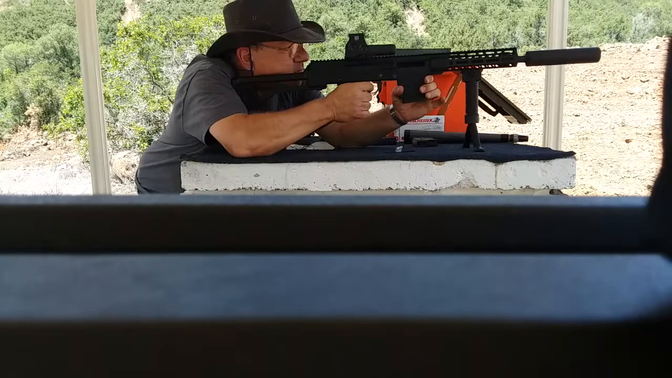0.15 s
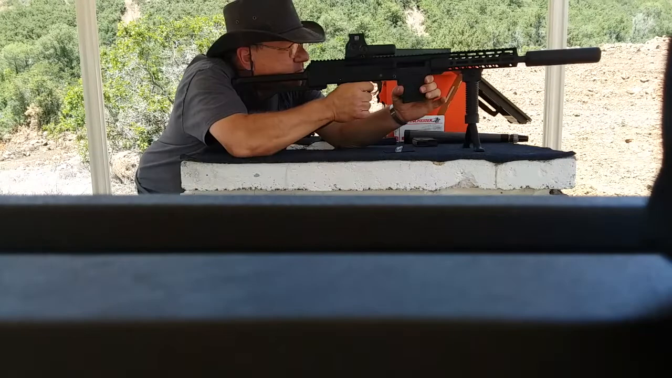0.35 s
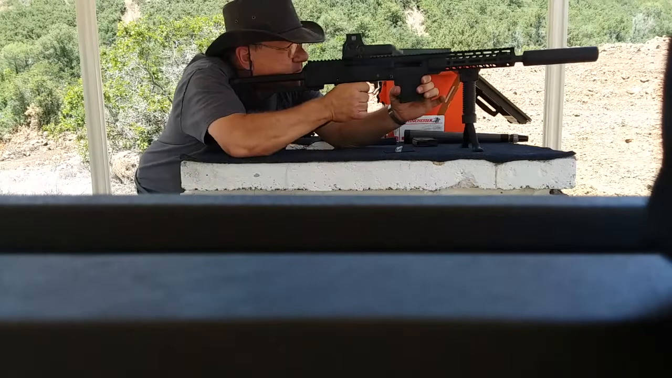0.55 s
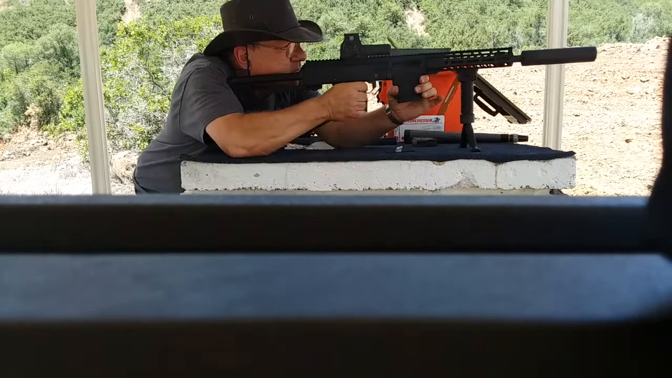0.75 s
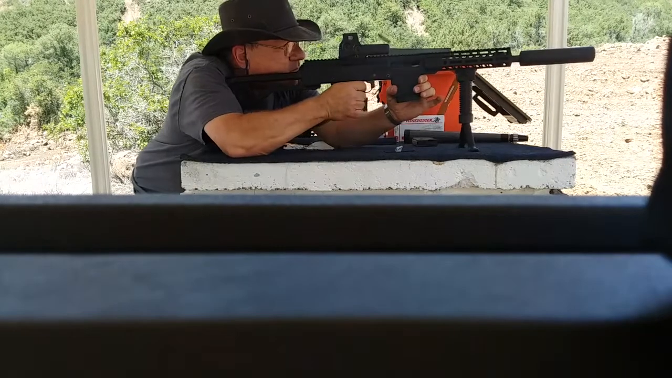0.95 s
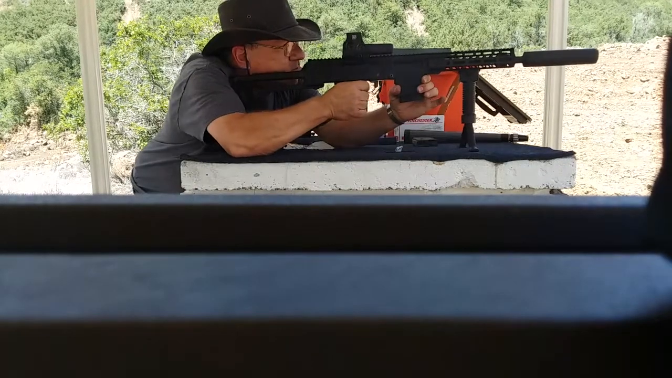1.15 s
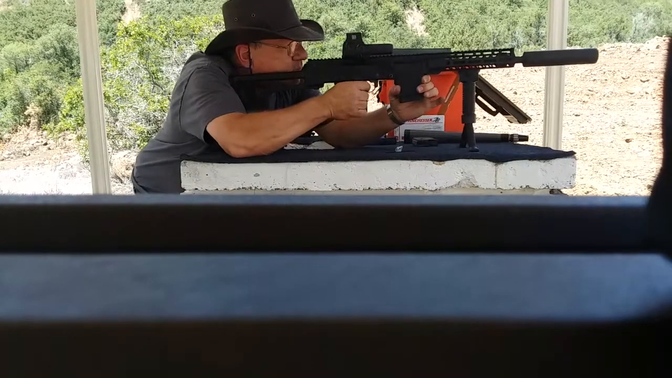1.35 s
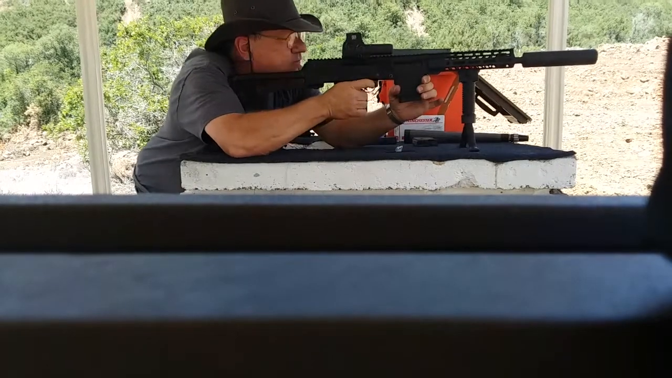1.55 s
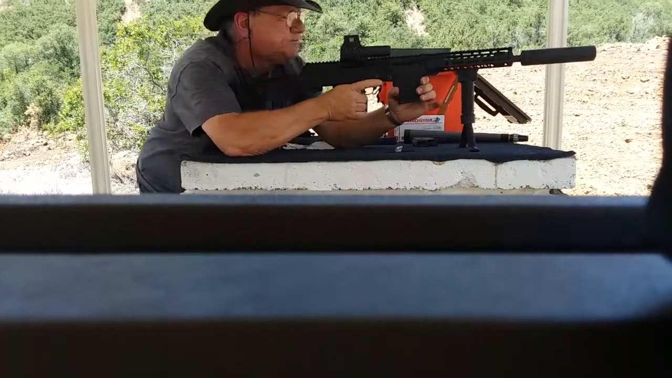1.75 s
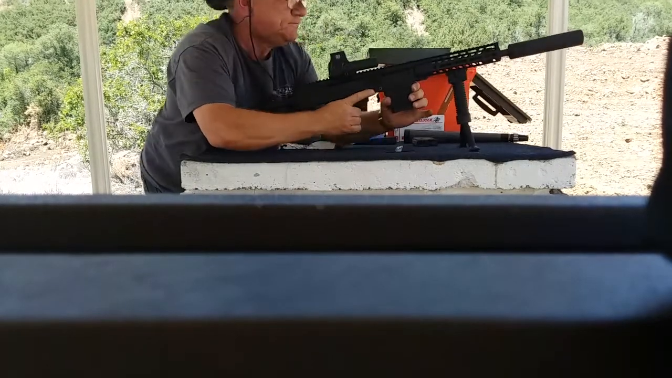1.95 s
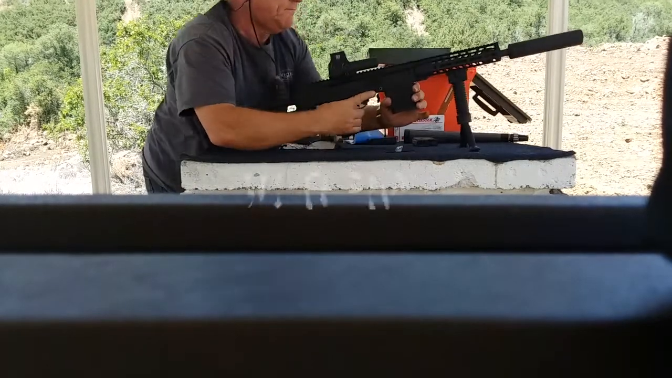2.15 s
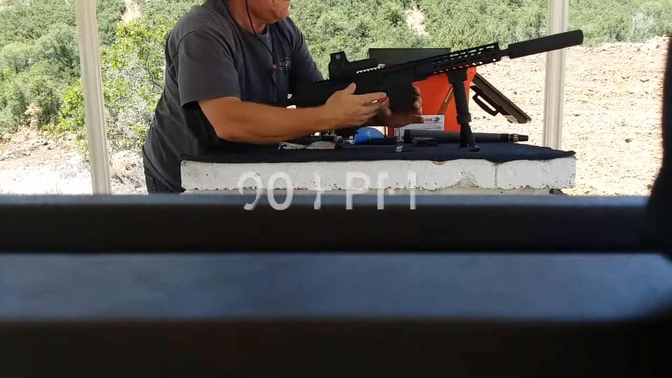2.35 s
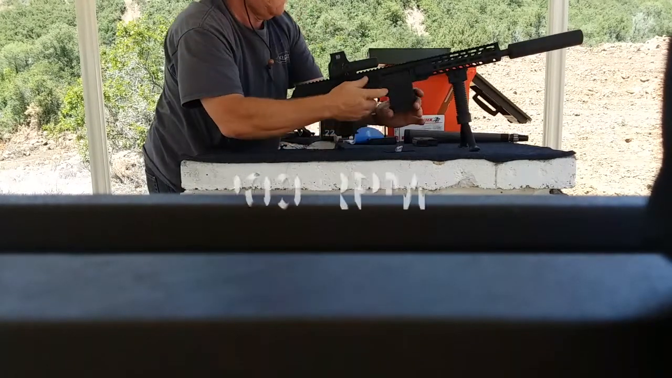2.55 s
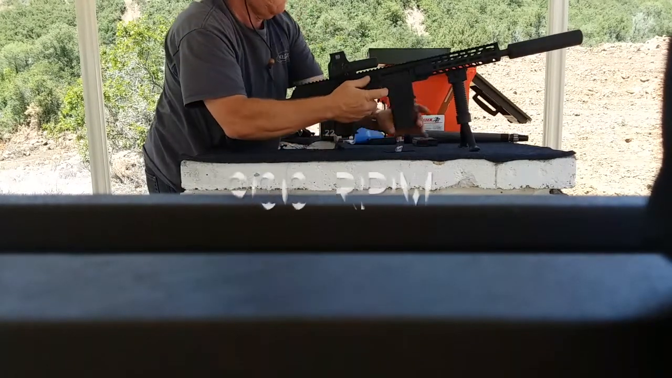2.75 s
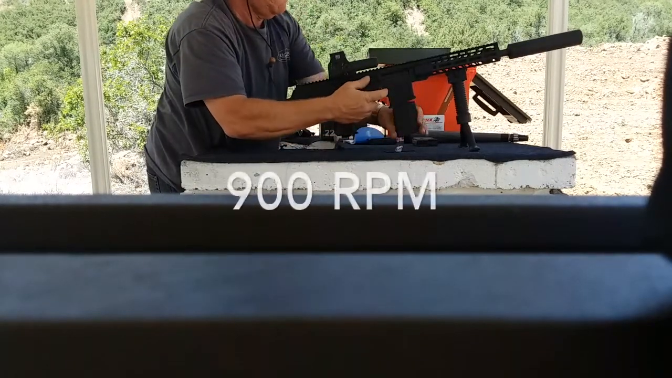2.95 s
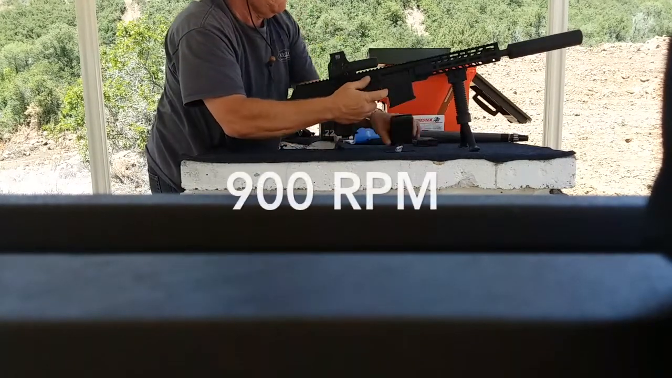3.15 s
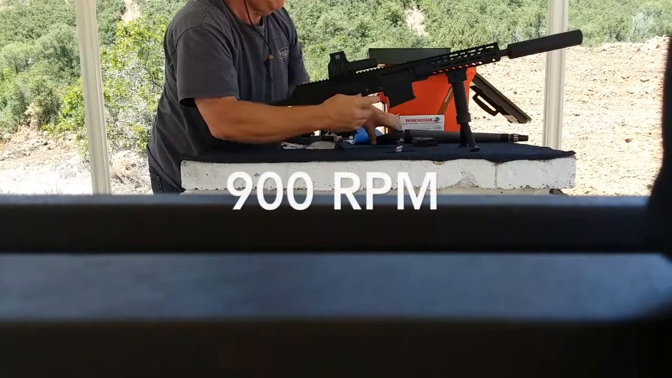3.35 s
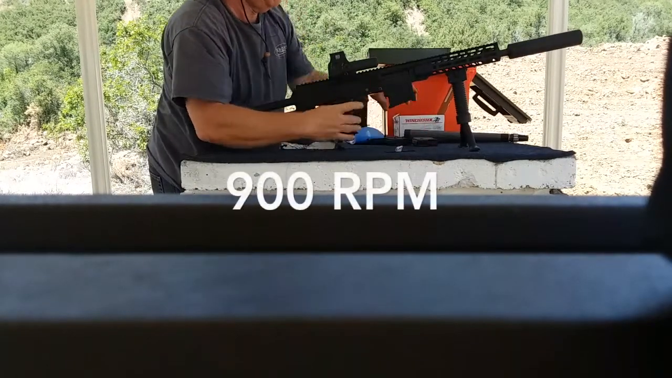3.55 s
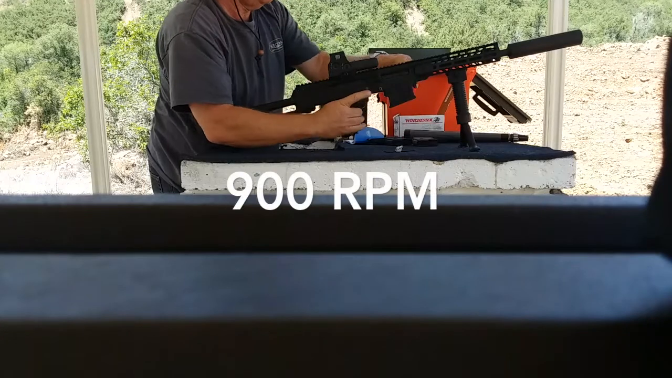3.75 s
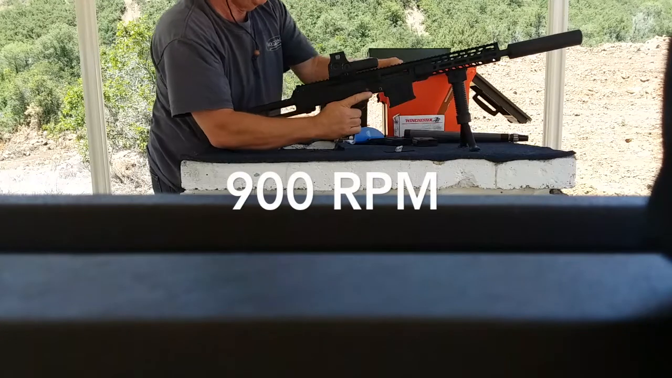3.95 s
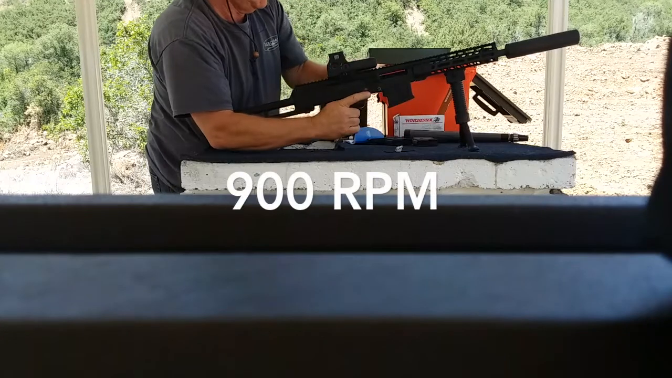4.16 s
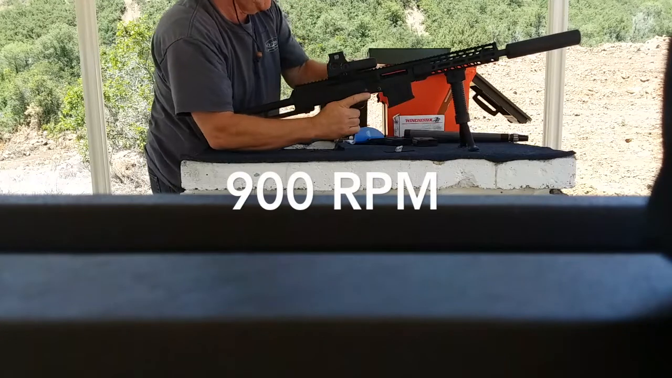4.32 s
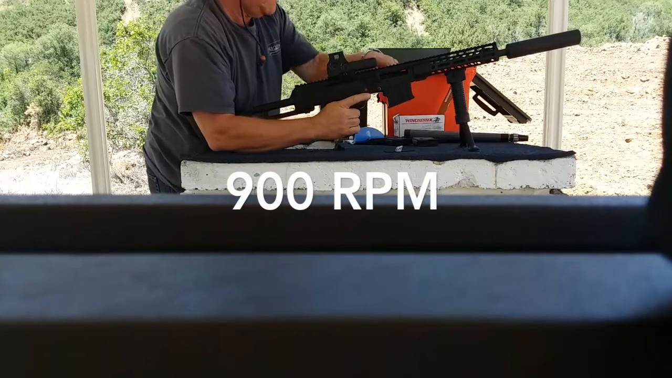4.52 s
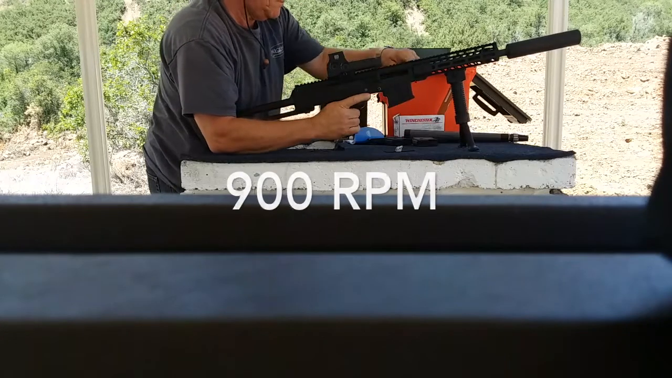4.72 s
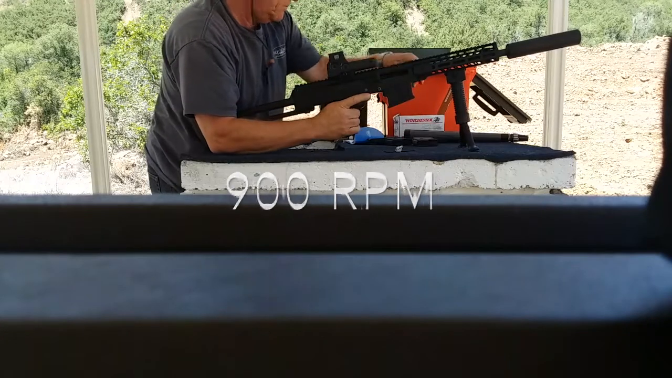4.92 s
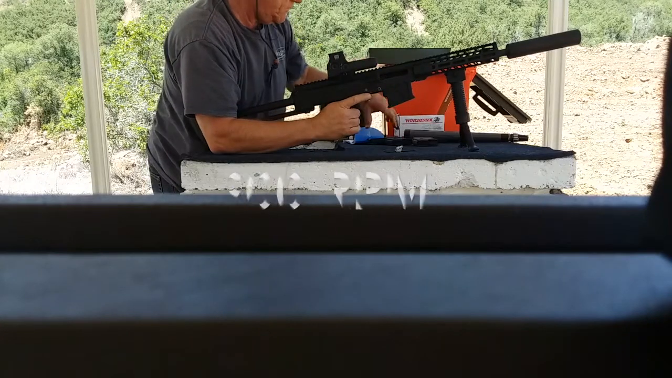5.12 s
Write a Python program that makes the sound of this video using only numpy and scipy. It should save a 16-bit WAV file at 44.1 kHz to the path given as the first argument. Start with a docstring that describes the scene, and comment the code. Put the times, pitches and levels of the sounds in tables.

```python
"""A low rumble and faint air come first, with a few clacks; then a suppressed rifle fires ten rounds on automatic.
It lies on a concrete bench under a shelter, close to the microphone; each round sounds as filtered bursts of noise.
Banded noise echoes from the hills; spent cases ring on the slab as beating sines.
Then the rifle is set down, its magazine is taken out and the action worked: noise rings resonators and rubs;
decaying sines make the bench boom and thin steel ring. A faint squeak comes near the end."""
import sys
import numpy as np
from scipy import signal
from scipy.fft import rfft, irfft
from scipy.io import wavfile
from scipy.ndimage import uniform_filter1d

SR = 44100
rng = np.random.default_rng(int(sys.argv[2]) if len(sys.argv) > 2 else 0)


def file_out(sig):
    """Save sig as 16-bit WAV at sys.argv[1]."""
    # one column per channel
    cols = np.atleast_2d(sig).T
    # limit, then scale
    lim = np.clip(cols, -1, 1)
    pcm = np.round(lim * 32767).astype(np.int16)
    wavfile.write(sys.argv[1], SR, pcm)


N = 233096
TIME = np.arange(N) / SR
AGE = TIME[:SR // 2]  # seconds since the start of one short sound

# Spectra of noise: frequency_hz, relative_density_db (per Hz)
AIR_SPECTRUM = [(30, -16.5), (80, -5), (200, -19.5), (600, -19), (2000, -26.5), (6000, -31.5), (16000, -33)]
HILL_SPECTRUM = [(60, -28), (130, 0), (200, -5.5), (350, -9.5), (550, -3.5), (1200, -6), (2500, -7.5),
                 (4000, -13.5), (5500, -24), (9000, -44.5)]
CLACK_SPECTRUM = [(60, -39.5), (200, -18), (450, -1), (900, 5.5), (2400, -1), (4000, -8.5), (5200, -14.5),
                  (7000, -11.5), (11000, -22.5), (16000, -18)]
BLAST_SPECTRUM = [(29, -52.5), (50, -25.5), (114, -5.5), (291, -9), (353, -1.5), (532, -6.5), (678, -1.5),
                  (1360, -6), (2320, -8), (2750, -10), (3580, -10.5), (6090, -17), (8970, -15.5),
                  (11700, -10), (16000, -17)]
# Resonances of the action under friction, main one first: frequency_hz, width_hz, gain_db
ACTION_MODES = [(1199, 45, 11), (1368, 265, -7.5), (2540, 440, -7.5), (3480, 200, -14)]
# Resonances of the struck receiver: frequency_hz, width_hz, gain_db
RECEIVER_MODES = [(537, 51, -4), (1223, 93, 6.5), (1370, 82, -9), (1890, 110, -5), (2330, 180, -6),
                  (2620, 61, -4.5), (3230, 50, -8), (3540, 93, -2.5), (4390, 45, -4), (6214, 93, 2),
                  (7050, 300, -9)]
# Thin steel parts that ring on as the rifle is set down: frequency_hz, relative_level_db, t60_s
STEEL_MODES = [(1836, -8, 0.33), (3408, -7, 0.45), (3740, -12, .43), (4210, -12, 0.2), (4350, 2, 0.17),
               (7262, -9, .19)]
# Dull bumps on the bench, and a spent case striking a plastic box at 1.254 s: start_s, peak_db, pitch_hz, t60_s
BUMPS = [(1.1, -26.5, 122.6, 0.54), (1.254, -22, 420.5, .17), (1.439, -40, 130, 0.23),
         (1.67, -44.5, 154.5, 0.27), (2.141, -34, 230.7, 0.42), (2.84, -33, 103.6, .087),
         (2.99, -44, 120.6, 0.13), (3.107, -42.5, 91.2, 0.078)]
# Spent cases land: start_s, main_ring_db, low_ring_db, tick_db
CASE_LANDINGS = [(1.335, -32.5, -46, -40), (1.438, -21.5, -33, -45), (1.57, -32.5, -53, -38),
                 (1.779, -27.5, -43, -40), (1.858, -27, -41, -37.5), (1.904, -35, -43, -36),
                 (2.104, -37, -38, -33), (2.142, -25, -40, -36), (2.245, -32, -45.5, -54),
                 (2.55, -39, -47.5, -58)]
# Parts slide and rub: start_s, length_s, rub_level_db, treble_db (before the hiss gain),
# main_mode_db (gain of the main resonance against the upper ones)
STROKES = [(1.549, 0.042, -38.5, -40, -18), (2.276, 0.052, -50, -48, -14), (2.48, 0.25, -43.5, -47, -14),
           (3.736, .15, -57, -72, -5), (3.911, 0.13, -43, -53, -7), (4.43, 0.13, -42, -59.5, -1)]
# Clacks of the rifle, its magazine and things that hit the benches: start_s, middle_band_db,
# weight_db and brightness_db (low and high band against the middle), contact_t60_s,
# receiver_ring_db (before the common ring gain)
CLACKS = [(0.28, -56, -18, -6, 0.034, -2), (0.416, -38.5, -20, 3, .044, -11),
          (.428, -18.5, -21, -6, 0.12, -17), (.453, -20.5, 0, -1, 0.047, -11),
          (1.116, -10, -3.5, 2.5, 0.0048, 2.5), (1.2532, -16.5, 4, -22, 0.0038, -32),
          (1.3462, -22.5, -17, 0, 0.0041, -26), (1.3564, -14.5, -9.5, -4.5, 0.0034, -30),
          (1.431, -24.5, -5, 0.5, 0.016, -27), (1.4484, -13.5, -6, -10.5, 0.0041, -28),
          (1.511, -26, -3.5, -2, .002, -14), (1.954, -34.5, -1, -10.5, 0.013, -12),
          (2.133, -25.5, -4, -3, 0.077, -12), (2.149, -22.5, -9.5, 0, 0.12, -6),
          (2.669, -23.5, -5.5, -7, 0.019, 5), (2.96, -39, -11, -18.5, 0.026, 2),
          (3.417, -28.5, -9, -17, 0.038, -9), (3.435, -25, -11.5, -17, 0.085, -16),
          (3.515, -27.5, -14, -18.5, 0.061, -12), (3.735, -42, -23, -8.5, 0.016, 0),
          (3.819, -41.5, -24, -7, .028, -5), (3.962, -29, -13.5, -9.5, 0.03, -10.5),
          (4.053, -17, -25, 1.5, 0.014, -13), (4.06, -16, -15.5, -4.5, 0.023, -10),
          (4.305, -26.5, -6.5, -3, .024, -3.5), (4.399, -44, -9, -3, .004, -9),
          (4.597, -16.5, -24, 1, 0.0073, 5.5), (4.605, -22.5, -23, -5, 0.01, 8),
          (4.794, -45, -31, -18, 0.013, 15)]
# What every round sets off: delay_s, rise_s, t60_s, low_hz, high_hz, level_db (before scatter and burst gain).
# Rows: supersonic crack, muzzle report, gas from the ejection port, carrier slides,
# buffer driven home, bolt slams shut, recoil thumps the bench.
# The filter widens bands below a third of an octave and ends them under half the sample rate.
ROUND_CYCLE = [(0.001, .002, 0.21, 12400, 14400, -18.5), (-.002, 0.0017, 0.15, 1250, 37000, -15.5),
               (.009, 0.013, 0.27, 1400, 4900, -16), (.016, 0.017, 0.2, 5700, 16000, -14.5),
               (.021, 0.015, 0.26, 310, 4000, -13.5), (.055, .003, 0.065, 460, 1300, -13.5),
               (0.053, 0.0044, 0.21, 53, 340, -25)]

AIR_DB = -73.5
BREEZE_DB = -80  # low rumble throughout
RUMBLE_DB, RUMBLE_RISE_S, RUMBLE_HOLD_S, RUMBLE_FALL_DB_PER_S = -57.5, .6, 1.9, 4.5  # stronger rumble
# Echo levels before the hill spectrum; holds count from the end of the burst
NEAR_ECHO_DB, NEAR_HOLD_S, NEAR_FALL_DB_PER_S = -30.5, 0.11, 33  # berm and trees
FAR_ECHO_DB, FAR_HOLD_S, FAR_FALL_DB_PER_S = -46, 1.874, 14  # far hills
SQUEAK_S, SQUEAK_LENGTH_S, SQUEAK_HZ, SQUEAK_DB = 4.91, .22, 666, -64
# The shooter's arms nudge the bench as he reaches over
LEAN_S, LEAN_GAP_S, LEAN_HZ, LEAN_DB = 3, .12, 88, -47.5  # mean times and pitch
CASE_HZ = 14850  # main mode of a case mouth
CASE_LOW_HZ, CASE_LOW_SPREAD_HZ = 10630, 110  # lower mode: mean and standard deviation over the cases
HOP_S, HOP_DB = .075, -13  # each case hops once, for about this long, and lands again more softly
STEEL_S, STEEL_DB = 2.16, -32
STROKE_RISE_SHARE, STROKE_T60_SHARE = 0.81, 1.77  # of a stroke's length
PART_HZ, BRIGHTNESS_DB_PER_OCTAVE = 2280, 15  # the smaller the struck part, the higher and brighter its clack
HANDLING_PAN_DB = 1.2  # left above right: the shooter sits a little to the left
FIRST_ROUND_S, ROUND_GAP_S, ROUND_COUNT = 0.4665, 0.0649, 10  # the trigger is held from the first round
BURST_END_S = FIRST_ROUND_S + ROUND_COUNT * ROUND_GAP_S
TOP_HZ = 16000  # upper limit of the whole sound


def undb(db):
    """Level and amplitude: 20 dB is a factor of ten in gain."""
    return 10 ** (np.asarray(db) / 20)


def unit(x):
    """Mean power: scale to rms 1."""
    return x / np.sqrt(np.mean(x ** 2))


def crest(x, size=176):
    """Short-time power: scale so that the loudest few milliseconds have rms 1."""
    return x / np.sqrt(uniform_filter1d(np.mean(x ** 2, axis=0), size).max())


def noise(size, alike=0.22):
    """Partial coherence: left and right noise share a common part of their power."""
    common, *own = rng.standard_normal((3, size))
    return np.sqrt(alike) * common + np.sqrt(1 - alike) * np.array(own)


def band(x, low_hz, high_hz, order=3):
    """Band limitation: a causal band-pass, at least a third of an octave wide."""
    high_hz = min(high_hz, SR / 2 - 1)
    low_hz = min(low_hz, high_hz / 2 ** (1 / 3))
    return signal.sosfilt(signal.butter(order, [low_hz, high_hz], "band", fs=SR, output="sos"), x)


def colour(x, spectrum):
    """Spectral weighting: shape steady noise by density points, to rms 1."""
    hz, db = np.transpose(spectrum)
    size = x.shape[-1]
    bins_hz = np.maximum(np.fft.rfftfreq(size, 1 / SR), 1)
    gain = undb(np.interp(np.log(bins_hz), np.log(hz), db))
    return unit(irfft(rfft(x) * gain, size))


def resonate(x, modes):
    """Modal superposition: parallel resonances respond to one excitation."""
    out = 0
    for hz, width_hz, db in modes:
        numerator, denominator = signal.iirpeak(hz, hz / width_hz, fs=SR)
        out = out + undb(db) * signal.lfilter(numerator, denominator, x)
    return out


def swell(rise_s, t60):
    """Damping: a quick linear rise, then an exponential fall of 60 dB in t60 seconds."""
    return np.minimum(AGE / rise_s, 1) * undb(-60 * np.maximum(AGE - rise_s, 0) / t60)


def flutter(size, rate_hz, depth_db):
    """Random modulation: a gain that wanders between normally distributed levels."""
    step = int(SR / rate_hz)
    levels = rng.standard_normal(size // step + 2)
    return undb(depth_db * np.interp(np.arange(size) / step, np.arange(len(levels)), levels))


def add(out, start_s, x):
    """Linear superposition: mix a sound in at its start."""
    i = int(start_s * SR)
    out[:, i:i + x.shape[1]] += x[:, :N - i]


def lingering(db, hold_s, fall_db_per_s, rise_s=.5):
    """Reverberant build-up and decay: a gain rises from the second round, holds past the burst and dies away."""
    rise = np.clip((TIME - FIRST_ROUND_S - ROUND_GAP_S) / rise_s, 0, 1)
    return rise * undb(db - fall_db_per_s * np.maximum(TIME - BURST_END_S - hold_s, 0))


def sheltered(x, room_db=0.0, roof_s=.0095, roof_db=-2, tail_db=-7, roof_t60=0.058, tail_t60=0.18):
    """Reflection: convolution adds scatter from bench and roof and a short tail to the direct sound."""
    size = len(AGE)
    scatter = noise(size) * flutter(size, 2500, 5.6) * swell(0.00041, roof_t60)
    roof = np.pad(scatter, ((0, 0), (int(roof_s * SR), 0)))[:, :size]
    tail = noise(size) * swell(.002, tail_t60)
    response = (undb(roof_db) * unit(roof) + undb(tail_db) * unit(tail)) / np.sqrt(size)
    return x + undb(room_db) * signal.fftconvolve(x, response, axes=1)[:, :size]


def outdoors():
    """Broadband background: a low rumble, stronger after the burst, under faint, even air."""
    strength = undb(BREEZE_DB) + lingering(RUMBLE_DB, RUMBLE_HOLD_S, RUMBLE_FALL_DB_PER_S, RUMBLE_RISE_S)
    rumble = unit(band(noise(N, 0.27), 60, 108, order=2)) * strength
    return rumble + undb(AIR_DB) * colour(noise(N), AIR_SPECTRUM)


def hills(first_hz=5400, dulling_s=2.16):
    """Scattering and air absorption: trees and slopes return the burst, duller the later the echo."""
    edge_hz = first_hz * np.exp(-np.maximum(TIME - BURST_END_S, 0) / dulling_s)
    spectrum_hz, spectrum_db = np.transpose(HILL_SPECTRUM)
    out = 0
    for hz in 100 * 2 ** (np.arange(13) / 2):  # half-octave bands
        # every slope sends its own share, which wavers on the way
        share = unit(band(noise(N), hz, hz * np.sqrt(2), order=5)) * flutter(N, 14, 1.3)
        share_db = np.interp(np.log(hz * 2 ** (1 / 4)), np.log(spectrum_hz), spectrum_db)
        bandwidth_gain = np.sqrt(hz / 2400)  # from density to band level
        absorption = 1 + (hz / edge_hz) ** 5
        out = out + share * undb(share_db) * bandwidth_gain / absorption
    near = lingering(NEAR_ECHO_DB, NEAR_HOLD_S, NEAR_FALL_DB_PER_S)
    far = lingering(FAR_ECHO_DB, FAR_HOLD_S, FAR_FALL_DB_PER_S)
    return out * np.hypot(near, far)  # the powers add


def squeak(fundamental_db=-7, waver_db=.5):
    """Harmonic tone: a faint, rough squeak swells and fades, strongest in its octave."""
    cycles = np.cumsum(SQUEAK_HZ * flutter(N, 300, waver_db)) / SR
    phase = 2 * np.pi * (cycles + rng.random((2, 1)))
    tone = undb(fundamental_db) * np.sin(phase) + np.sin(2 * phase)
    arch = np.sin(np.pi * np.clip((TIME - SQUEAK_S) / SQUEAK_LENGTH_S, 0, 1))
    return undb(SQUEAK_DB) * arch * unit(tone * flutter(N, 60, 2.5))


def bumps(upper_ratio=1.1, upper_db=-11, lean_t60=0.072, lean_scatter=0.152, count=3):
    """Damped modes: weight makes the bench boom, and a case makes a plastic box thud, in two close modes; a few
    soft nudges are among them."""
    out = np.zeros((2, N))
    nudges = []
    for k, (late, higher) in enumerate(lean_scatter * rng.standard_normal((count, 2))):
        start_s = LEAN_S + LEAN_GAP_S * (k + late)
        nudges.append((start_s, LEAN_DB, LEAN_HZ * np.exp(higher), lean_t60))
    for start_s, db, hz, t60 in list(BUMPS) + nudges:
        boom = np.sin(2 * np.pi * hz * AGE)
        boom = boom + undb(upper_db) * np.sin(2 * np.pi * hz * upper_ratio * AGE)
        add(out, start_s, undb(db) * crest(boom * swell(0.009, t60) * np.ones((2, 1))))
    return out


def cases(ring_t60=0.43, strike_db=6, strike_t60=0.043, tick_t60=0.034, beat_hz=60, hop_scatter=0.18):
    """Beating of close modes: brass tubes tick on concrete, hop, and ring on as they spin."""
    out, size = np.zeros((2, N)), len(AGE)
    fade = swell(.012, ring_t60) + undb(strike_db) * swell(.006, strike_t60)
    for start_s, ring_db, low_db, tick_db in CASE_LANDINGS:
        shape, bounce = rng.standard_normal(2)
        low_hz = CASE_LOW_HZ + CASE_LOW_SPREAD_HZ * shape
        second_s = start_s + HOP_S * (1 + hop_scatter * bounce)
        for lands_s, loss_db in (start_s, 0), (second_s, HOP_DB):
            for hz, db in (CASE_HZ, ring_db), (low_hz, low_db):
                cluster_hz = hz + beat_hz * rng.standard_normal(size=(3, 1, 1))
                cycles = cluster_hz * AGE + rng.random(size=(3, 2, 1))
                tone = np.sin(2 * np.pi * cycles).sum(axis=0)
                add(out, lands_s, undb(db + loss_db) * crest(tone * flutter(size, 150, 2.0) * fade))
            tick = band(noise(size), 4600, 19000, order=1) * flutter(size, 624, 4.4)
            tick = tick * swell(.008, tick_t60)
            add(out, lands_s, undb(tick_db + loss_db) * crest(sheltered(tick)))
    return out


def steel():
    """Free vibration: thin steel parts ring on after the rifle lands on the bench."""
    out = np.zeros((2, N))
    ring = 0
    for hz, db, t60 in STEEL_MODES:
        tone = np.sin(2 * np.pi * (hz * AGE + rng.random((2, 1))))
        ring = ring + undb(db) * tone * swell(.004, t60)
    add(out, STEEL_S, undb(STEEL_DB) * crest(ring))
    return out


def slides(hiss_db=-1, uneven_db=3.0):
    """Friction excitation: dense catches ring the action and hiss; strokes gather speed, hold and let go."""
    grains = noise(N) * flutter(N, 500, 2.3) * flutter(N, 45, uneven_db)
    hiss = unit(band(grains, 1500, 6500, order=1))
    main, upper = resonate(grains, ACTION_MODES[:1]), resonate(grains, ACTION_MODES[1:])
    out = 0
    for start_s, length_s, db, treble_db, ring_db in STROKES:
        done = (TIME - start_s) / length_s
        rise = np.clip(done / STROKE_RISE_SHARE, 0, 1)
        speed = rise * undb(-60 * np.maximum(done - 1, 0) / STROKE_T60_SHARE)
        rub = unit(undb(ring_db) * main + upper)
        out = out + speed * (undb(db) * rub + undb(treble_db + hiss_db) * hiss)
    return out


def knocks(ring_db=5, part_db=6, part_width=0.3, rattle_db=-16, rattle_t60=.06, softness=.11, near_db=-5,
           receiver_from_db=-6):
    """Impact excitation: a sharp contact and its rattle ring the struck part and receiver in the shelter."""
    out, size = np.zeros((2, N)), len(AGE)
    for start_s, level_db, weight_db, bright_db, contact_t60, metal_db in CLACKS:
        chatter = colour(noise(size), CLACK_SPECTRUM) * flutter(size, 1200, 3)
        # a long, scraping contact also starts softly
        contact = swell(contact_t60 * softness, contact_t60)
        push = chatter * (contact + undb(rattle_db) * swell(contact_t60 * softness, rattle_t60))
        part_hz = PART_HZ * 2 ** (bright_db / BRIGHTNESS_DB_PER_OCTAVE)
        # blows on the receiver ring it rather than a loose part
        own_db = part_db - max(metal_db - receiver_from_db, 0)
        push = push + resonate(push, [(part_hz, part_hz * part_width, own_db)])
        receiver = undb(ring_db + metal_db) * resonate(push, RECEIVER_MODES)
        # blows that hardly ring the receiver land near the microphone and are drier
        room_db = np.interp(metal_db, [-20, -10], [near_db, 0])
        hit = sheltered(push + receiver, room_db)
        for low_hz, high_hz, db in (150, 750, weight_db), (750, 3000, 0), (3000, 16000, bright_db):
            add(out, start_s, undb(level_db + db) * crest(band(hit, low_hz, high_hz)))
    return out


def zing(zing_db=-17.5):
    """Frequency glide: a thin whistle falls within milliseconds at each round, before the burst gain."""
    hz = 9000 + 5400 * np.exp(-AGE / .0085)
    phase = 2 * np.pi * (np.cumsum(hz) / SR + 0.24 * rng.random((2, 1)))
    return undb(zing_db) * crest(np.sin(phase) * swell(.007, .018))


def burst(repeat=0.27, grit_db=0.56, jitter=.04, scatter_db=1.85, burst_db=3.5, timing_s=.0007):
    """Periodic excitation: rounds run through one cycle, and the same paths make part of its sound repeat."""
    out, size = np.zeros((2, N)), len(AGE)
    rounds_s = FIRST_ROUND_S + ROUND_GAP_S * np.arange(ROUND_COUNT)
    rounds_s = rounds_s + timing_s * rng.standard_normal(ROUND_COUNT)
    for delay_s, rise_s, t60, low_hz, high_hz, db in ROUND_CYCLE:
        alike = .6 if high_hz < 1600 else .08  # long waves reach both ports alike
        paths = noise(size, alike)
        for start_s in rounds_s:
            mixed = np.sqrt(repeat) * paths + np.sqrt(1 - repeat) * noise(size, alike)
            gas = colour(mixed, BLAST_SPECTRUM) * flutter(size, 500, grit_db)
            gas = unit(band(gas, low_hz, high_hz, order=2))
            late, louder = rng.standard_normal(2)  # no two cycles are quite alike
            gas = gas * undb(db + scatter_db * louder) * swell(rise_s, t60)
            add(out, start_s + delay_s * (1 + jitter * late), gas)
    for start_s in rounds_s:
        add(out, start_s, zing())
    return undb(burst_db) * out


def scene():
    """Superposition: the range, the aftermath and the burst add linearly."""
    pan = undb(np.array([[HANDLING_PAN_DB], [-HANDLING_PAN_DB]]) / 2)
    handling = (knocks() + slides() + steel()) * pan
    return outdoors() + hills() + squeak() + bumps() + cases() + handling + burst()


def record(dry, limit_db=-11.5, size=600):
    """Amplitude compression: a limiter evens the burst; peaks are rounded and the top is cut."""
    power = uniform_filter1d(np.mean(dry ** 2, axis=0), size)
    held = dry / (1 + (power / undb(limit_db) ** 2) ** 4) ** (1 / 8)
    rounded = 2 * np.tanh(held / 2)
    return signal.sosfilt(signal.ellip(10, .2, 70, TOP_HZ, fs=SR, output="sos"), rounded)


dry = scene()
out = record(dry)
file_out(out)
```